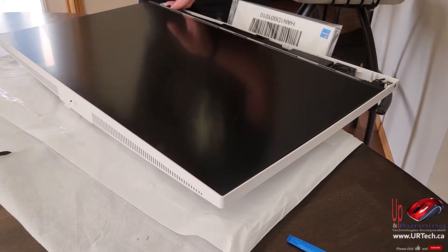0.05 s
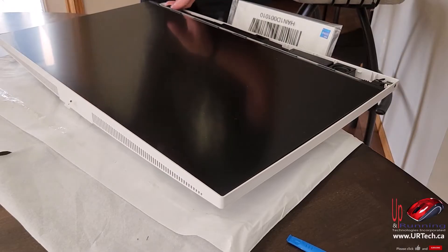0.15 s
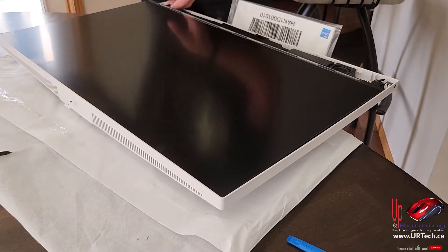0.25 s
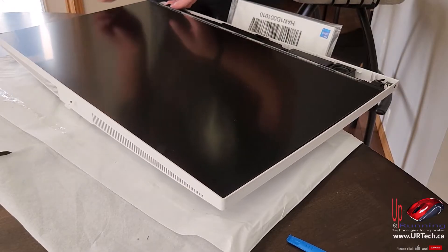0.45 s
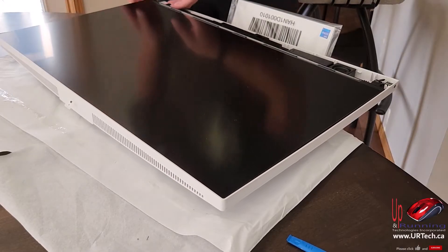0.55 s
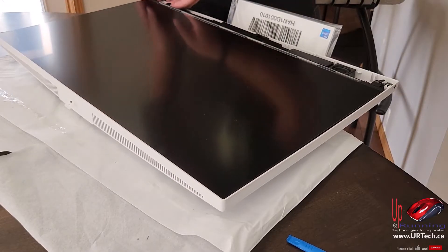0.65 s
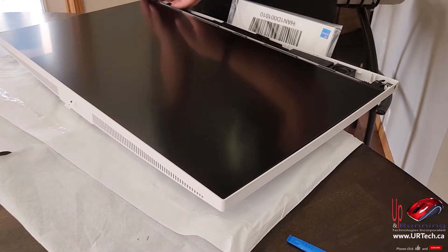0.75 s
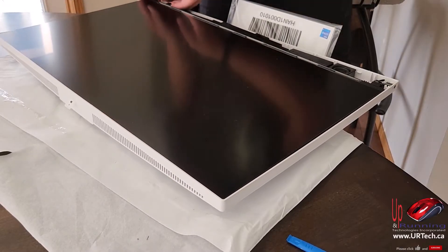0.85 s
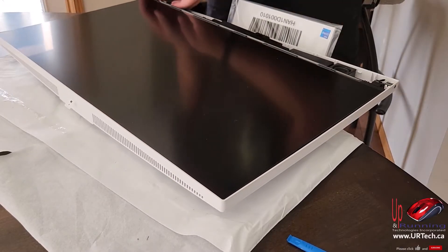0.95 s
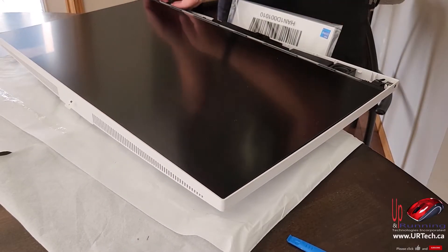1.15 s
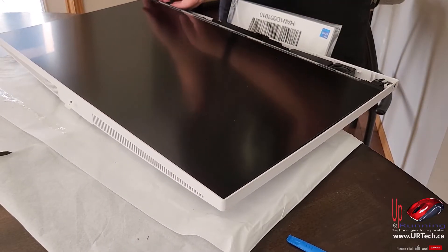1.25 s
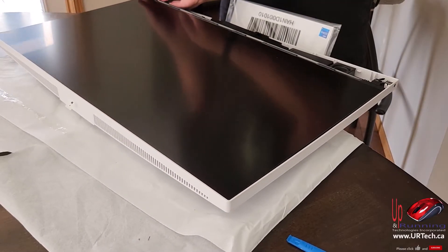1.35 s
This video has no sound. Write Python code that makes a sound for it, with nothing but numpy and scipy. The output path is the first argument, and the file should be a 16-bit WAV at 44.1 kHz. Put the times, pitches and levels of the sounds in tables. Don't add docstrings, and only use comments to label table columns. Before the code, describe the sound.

Sharp plastic cracks of retaining clips popping free, then soft finger rubs and knocks on the case

```python
import sys
import numpy as np
from scipy import signal
from scipy.fft import rfft, irfft
from scipy.io import wavfile

SR = 44100
rng = np.random.default_rng(int(sys.argv[2]) if len(sys.argv) > 2 else 0)


def linear_from_db(decibels):
    return 10 ** (np.asarray(decibels, float) / 20)


def store_pcm(level_fs):
    pcm = np.round(np.clip(level_fs, -1, 1) * 32767).astype(np.int16)
    wavfile.write(sys.argv[1], SR, np.atleast_2d(pcm).T)


N = 61739
HZ = np.fft.rfftfreq(N, 1 / SR)
T = np.arange(N) / SR


def evened(x):
    return x / np.sqrt(np.mean(x ** 2) + 1e-20)


def read(points, hz):
    f, value = np.transpose(points)
    return np.interp(np.log(hz + 1), np.log(f + 1), value)


def curve(points):
    return linear_from_db(np.interp(T, *np.transpose(points)))


def resonate(x, hz, width_hz):
    r = np.exp(-np.pi * width_hz / SR)
    pole = r * np.exp(2j * np.pi * hz / SR)
    return 2 * signal.lfilter([1 - r], [1, -pole], x).real


def add(mix, start_s, sound):
    part = mix[round(start_s * SR):][:len(sound)]
    part += sound[:len(part)]


def hiss(points):
    spectrum = rfft(rng.standard_normal((2, N)))
    return evened(irfft(spectrum * linear_from_db(read(points, HZ)) * (HZ < 16500), N))


def hum(hz, width_hz):
    once = resonate(rng.standard_normal(N), hz, width_hz)
    return evened(resonate(once, hz, width_hz))


def ports(pair, likeness, tilt, lag_s, edge_hz):
    same = np.clip(read(likeness, HZ), -1, 1)
    a, b = rfft(pair) / (1 + (HZ / edge_hz) ** 160)
    turn = linear_from_db(read(tilt, HZ) / 2) * np.exp(1j * np.pi * HZ * lag_s)
    right = same * a + np.sqrt(1 - same ** 2) * b
    return irfft(np.array([a * turn, right / turn]), N)


def still_air():
    # freq_hz, level_db
    air = [(15, -30), (55, 0.5), (270, -19), (377, -16.5), (472, -18), (2200, -29.5), (9000, -42.5),
           (12500, -69)]
    return linear_from_db(-65) * hiss(air)


def room(x):
    # freq_hz, t60_s
    decay = [(100, 0.32), (500, 0.59), (1500, 0.65), (3000, 0.48), (6000, 0.61), (10000, 0.35),
             (16000, 0.32)]
    # freq_hz, level_db
    colour = [(100, -2), (900, -1), (2300, 3), (4300, 2.5), (6400, 2), (7800, -0.5), (9000, 2.5),
              (16000, -9)]
    gap_s = 0.0012
    taps = np.zeros((2, SR))
    at = np.arange(0, SR - 12, 12) + rng.integers(0, 12, (2, (SR - 1) // 12))
    np.put_along_axis(taps, at, rng.choice([-1., 1.], at.shape), 1)
    hz, t, z = signal.stft(taps, SR, nperseg=256)
    decay_db = read(colour, hz)[:, None] - 60 * t / read(decay, hz)[:, None]
    tail = signal.istft(z * linear_from_db(decay_db), SR, nperseg=256)[1]
    tail = tail * np.clip(np.arange(tail.shape[1]) / SR / gap_s - 1, 0, 1)
    return signal.fftconvolve(x[None], tail / np.linalg.norm(tail[0]), axes=1)[:, :N]


def table_sway():
    # time_s, level_db
    rocking = [(0, -67.5), (.52, -60.5), (.585, -52.5), (.66, -59), (.76, -53), (.81, -69.5), (1.05, -61),
               (1.23, -62), (1.4, -72)]
    return curve(rocking) * hum(30.2, 63)


def panel_flex():
    # time_s, level_db
    bending = [(0, -78.5), (.215, -67.5), (.25, -47.5), (.3, -64), (.52, -58.5), (.55, -55.5),
               (.635, -55.5), (.67, -94.5), (.97, -67.5), (1.02, -56.5), (1.16, -58), (1.24, -55.5),
               (1.27, -90)]
    return curve(bending) * hum(136, 17)


def skin_slide():
    # time_s, level_db
    level = [(.62, -98), (.77, -75), (.81, -69.5), (.84, -63.5), (.91, -63), (.985, -68), (1.025, -52),
             (1.06, -65), (1.105, -68.5), (1.115, -56), (1.17, -63.5), (1.21, -72), (1.4, -67)]
    # time_s, gain_db
    bright = [(.83, 6), (.95, 3), (1.03, -5.5), (1.17, -2), (1.21, -22)]
    # freq_hz, level_db
    colour = [(600, -3.5), (1500, -0.5), (2500, -7), (4500, -13), (6200, -14.5), (7600, -8.5),
              (9100, -17.5), (16000, -22)]
    skin = hiss(colour)
    treble = irfft(rfft(skin) / (1 + (9000. / (HZ + 1)) ** 4), N)
    return linear_from_db(4.5) * curve(level) * (skin + (curve(bright) - 1) * treble)


def housing(force):
    # freq_hz, level_db, t60_s
    modes = [(204, -18, 0.076), (256.3, 4, 0.2), (343, 3.5, 0.025), (420, -19, 0.034), (680, -6, 0.014),
             (810, -11.5, 0.025), (909, -0.5, 0.088), (1223, -9.5, 0.1), (1431, -18, 0.17),
             (1990, -13.5, 0.061)]
    return sum(linear_from_db(db) * resonate(force, hz, 1.63 / t60) for hz, db, t60 in modes)


def finger_grip():
    # time_s, level_db
    pressure = [(0, -77), (.5, -53.5), (.805, -70), (.83, -59.5), (.91, -60.5), (.97, -82), (1.02, -50),
                (1.07, -54.5), (1.11, -55), (1.15, -55.5), (1.2, -56), (1.27, -63), (1.4, -67)]
    grains_per_s, spread_db, low_cut_hz = 350, 3.5, 416.0
    size = linear_from_db(spread_db * np.minimum(rng.exponential(1, N), 4))
    grains = size * (rng.random(N) < grains_per_s / SR) * rng.choice([-1., 1.], N)
    grip = housing(grains + .08 * rng.standard_normal(N))
    grip = irfft(rfft(grip) * HZ ** 2 / (HZ ** 2 + low_cut_hz ** 2), N)
    return linear_from_db(-1) * curve(pressure) * evened(grip)


def case_knocks():
    # start_s, level_db, pitch_hz, t60_s
    knocks = [(.247, -49.5, 75.5, 0.22), (.247, -31, 93, 0.097), (0.53, -47, 66.4, 0.052),
              (.25, -38, 519, 0.075), (.43, -43, 86, 0.16), (.814, -51, 400, .05), (.8195, -44, 470, .05),
              (.828, -45, 710, .04), (.833, -49, 1200, 0.03), (.841, -40, 680, .08), (.850, -46, 690, .03),
              (1.0930, -37, 390, .04), (1.0932, -39, 1300, .008), (1.0957, -41, 800, .012),
              (1.111, -42, 930, .06), (.870, -48, 710, .04), (.878, -48, 430, .08), (.890, -51, 1250, .03),
              (.896, -48, 710, .04), (.905, -52, 1280, .04), (1.017, -45, 920, .03), (1.023, -47, 880, .03),
              (1.037, -48, 330, .04), (1.044, -47, 680, .03), (1.078, -48, 400, .05),
              (1.106, -47, 650, .02), (1.117, -46, 380, .04), (1.124, -48, 700, .03),
              (.496, -40.5, 876, 0.031), (1.150, -46.5, 252, 0.057), (1.175, -49, 272, .06),
              (1.297, -53.5, 740, .05), (1.322, -52, 740, 0.054), (1.347, -53.5, 945, 0.06),
              (.555, -49, 230, 0.075), (.862, -50.5, 310, 0.095), (1.238, -51, 733, 0.09),
              (.162, -51, 850, 0.031), (.02, -59, 963, 0.043), (.10, -61.5, 2080, 0.063),
              (.73, -56.5, 137, 0.22)]
    rise = .07
    out = np.zeros(N)
    t = np.arange(5000) / SR
    for start_s, db, hz, t60 in knocks:
        envelope = linear_from_db(db - 60 * t / t60) * np.minimum(t / (rise * t60), 1)
        add(out, start_s, envelope * np.sin(2 * np.pi * hz * t))
    return out


def snap(db, slip_ms, thump_db, clip, swell_db, flat_db, wander):
    crack_gap_ms, crack_fall = .62, 1.5
    widen, blunt_width = 1.4, 0.65
    thin_hz = 550
    t = np.arange(6000) / SR
    u = t / (slip_ms / 1000)
    gaps = t * 1000 / crack_gap_ms
    beat = gaps + 0.098 * np.sin(1.8 * gaps + 2 * np.pi * rng.random())
    slip = (u < 1) * linear_from_db(swell_db * (u - 1)) * np.exp(-crack_fall * (beat % 1))
    tick = np.linalg.norm(slip) * (t == 0)
    pair = linear_from_db(-8) * slip * rng.standard_normal((2, len(t)))
    blunt = linear_from_db(flat_db) * tick
    for k, (hz, width, level_db) in enumerate(clip):
        steps = rng.standard_normal((2, len(t)))
        walk = np.cumsum(steps, 1) * np.sqrt(2 * np.pi * wander * width / SR)
        phase = 2 * np.pi * (hz * t + rng.random((2, 1))) + walk
        shake = slip * np.cos(phase) * np.sqrt(4 * width / SR)
        ring = resonate(shake, hz, widen * width)
        target = np.linalg.norm(resonate(tick, hz, widen * width))
        ring = ring * target / np.linalg.norm(ring, axis=1, keepdims=True)
        pair = pair + linear_from_db(level_db) * ring
        dull = resonate(tick, hz, blunt_width * width) / np.sqrt(blunt_width)
        blunt = blunt + (-1) ** k * linear_from_db(level_db) * dull
    pair = signal.lfilter(*signal.butter(2, thin_hz, "high", fs=SR), pair)
    jolt = housing(np.diff(np.sin(np.pi * np.minimum(u, 1)) ** 2, prepend=0))
    jolt = linear_from_db(thump_db) * jolt / abs(jolt).max()
    top = abs(pair[0]).max()
    return linear_from_db(db) * np.array([pair[0] / top + jolt, pair[1] / top, blunt / top + linear_from_db(-5) * jolt])


def clip_snaps():
    # start_s, peak_db, slip_ms, room_send_db, thump_db
    events = [(.2210, -27, 2.5, -4, -24), (.2399, -22, 4.5, -11, -24), (.2503, -12, 1.7, -11, -20),
              (.2529, -13, 1.4, -12, -22), (.4181, -12, 1.4, -15, -19), (.4209, -22, .7, -18, -28),
              (.4821, -11.5, 2.1, -11, -30), (.5473, -31, 1.2, -5, -26), (.5540, -29, 1.5, -5, -26),
              (.2465, -31, 2.0, -10, -30), (.443, -32, 1.5, -12, -30), (.2240, -31, 2.0, -6, -26),
              (.2268, -32, 2.0, -8, -26), (.2318, -33, 3.0, -8, -26), (.2424, -24, 2.0, -12, -16),
              (.2635, -27, 2.5, -12, -24), (.462, -38, 1.5, -10, -30), (.4925, -28, 2.0, -12, -20)]
    clip_of = [3, 3, 0, 0, 1, 1, 2, 4, 4, 3, 4, 3, 3, 3, 3, 3, 4, 3]
    # freq_hz, width_hz, level_db
    clip_a = [(954, 133, 10.5), (2033, 230, 9.5), (3150, 1300, 6.5), (5340, 1240, 10.5), (7730, 1160, 3),
              (8960, 2250, 2), (13020, 3700, -1)]
    clip_b = [(2267, 740, 8.5), (3606, 1700, 0), (5830, 370, 4.5), (8170, 840, -2), (9670, 1600, -13),
              (13170, 1200, -29)]
    clip_c = [(860, 300, -1), (2100, 700, 0), (2600, 800, 3), (5450, 500, 3), (7600, 710, -9),
              (10300, 600, -1), (14400, 2200, -14)]
    clip_d = [(1405, 1500, -5), (2335, 150, 4), (3030, 360, -1), (5170, 1700, -6.5), (7700, 2000, -16),
              (11580, 4000, -25)]
    clip_e = [(2720, 7500, -10.5), (5190, 170, 12), (7600, 370, 8.5), (10350, 510, 11), (13500, 390, 3.5)]
    swell_db = [-1, 9, 0, -9, 2]
    flat_db = [3, -8, -3, -7, 0]
    wander = [.35, .25, .7, .5, .5]
    clips = [clip_a, clip_b, clip_c, clip_d, clip_e]
    near, send = np.zeros((2, N)), np.zeros(N)
    for (start_s, db, slip_ms, wet_db, thump_db), k in zip(events, clip_of):
        left, right, blunt = snap(db, slip_ms, thump_db, clips[k], swell_db[k], flat_db[k], wander[k])
        add(near[0], start_s, left)
        add(near[1], start_s, right)
        add(send, start_s, linear_from_db(wet_db) * blunt)
    return near, send


def scene():
    # freq_hz, likeness
    same_near = [(300, 0.99), (2500, 0.86), (6000, 0.24), (8500, 0.06), (15000, 0.15)]
    same_far = [(100, 0.94), (350, 0.76), (900, 0.15), (2000, 0.096), (6000, 0.015), (15000, 0.047)]
    # freq_hz, balance_db
    near_tilt = [(60, 1), (300, 2), (900, 4.5), (2500, 5.5), (6000, 4.5), (13000, 2)]
    far_tilt = [(100, 1), (900, 2.5), (2500, 2.5), (5500, 0.5), (13000, -4)]
    snap_lag_s, hand_lag_s = .00036, .00009
    edge_hz, top_hz = 15650, 16600
    near, send = clip_snaps()
    hand = finger_grip() + case_knocks()
    far = linear_from_db(6.5) * room(send + linear_from_db(-9.5) * hand) + skin_slide()
    far = far + linear_from_db(-2) * resonate(far, 5510, 250)
    far = far + still_air()
    body = hand + panel_flex() + table_sway()
    return (ports(near, same_near, near_tilt, snap_lag_s, top_hz)
            + ports(far, same_far, far_tilt, hand_lag_s, edge_hz)
            + ports(np.array([body, 0 * hand]), same_near, far_tilt, hand_lag_s, edge_hz))


def low_pass(x):
    return signal.sosfilt(signal.butter(12, 16810, fs=SR, output="sos"), x)


def record(dry):
    ceiling = .7
    return low_pass(ceiling * np.tanh(dry / ceiling))


dry = scene()
out = record(dry)
store_pcm(out)
```